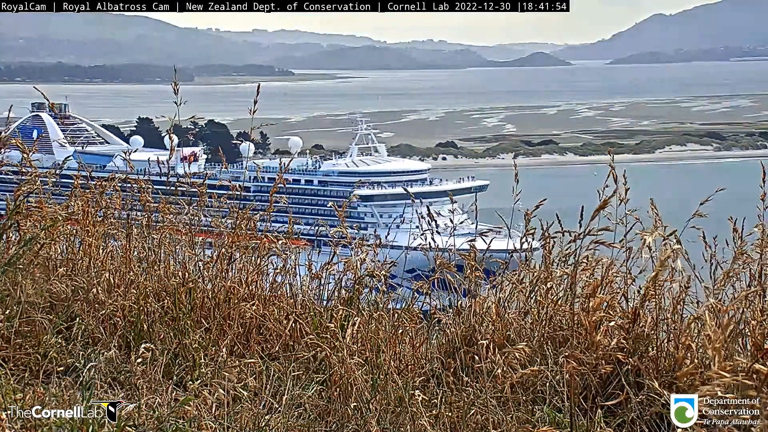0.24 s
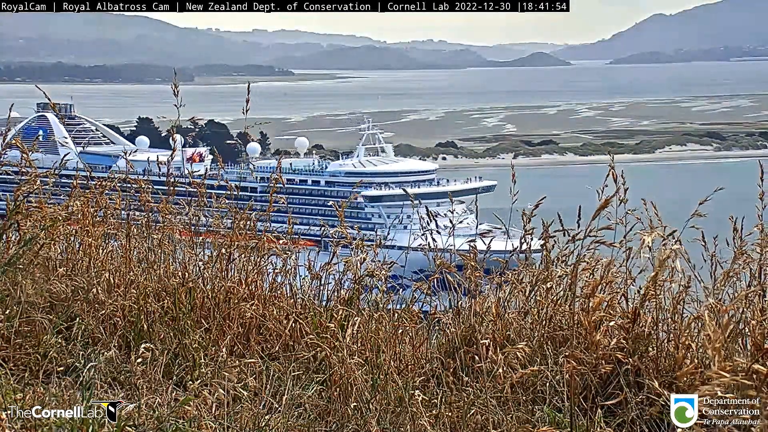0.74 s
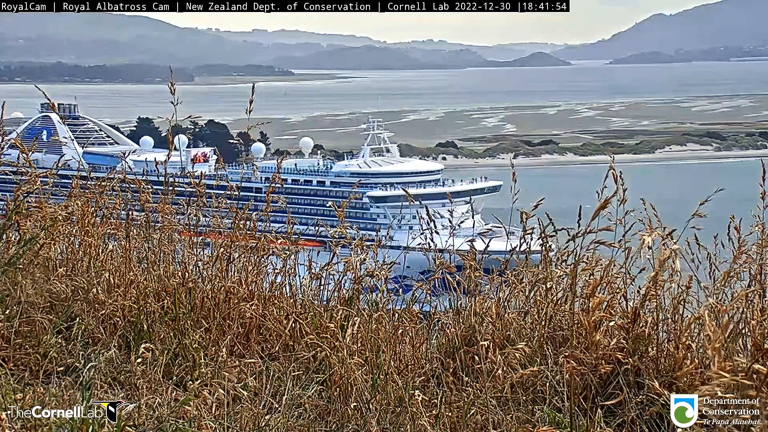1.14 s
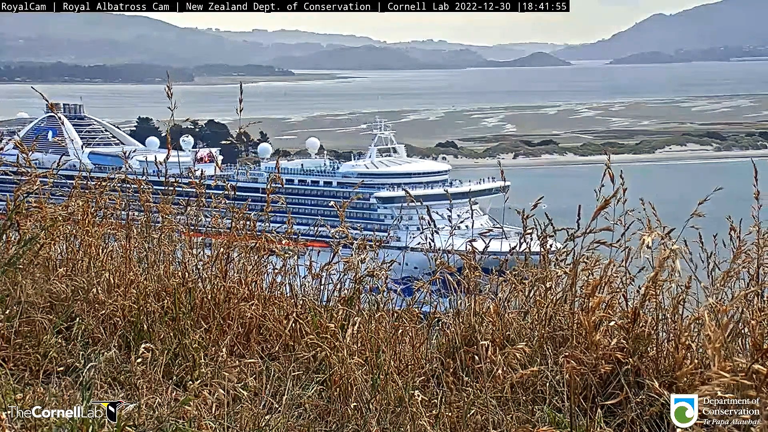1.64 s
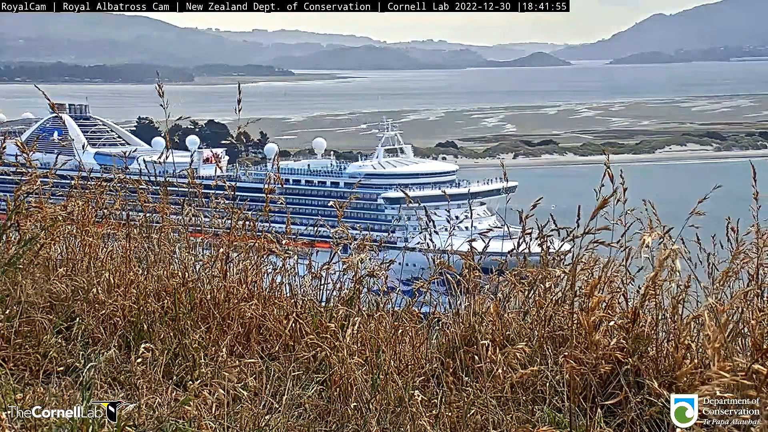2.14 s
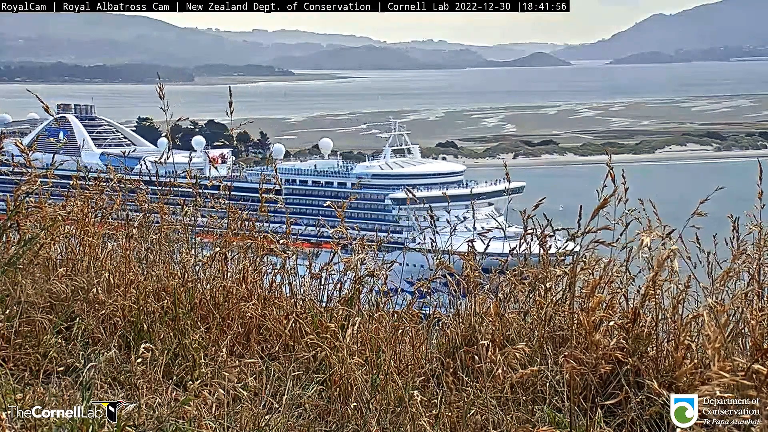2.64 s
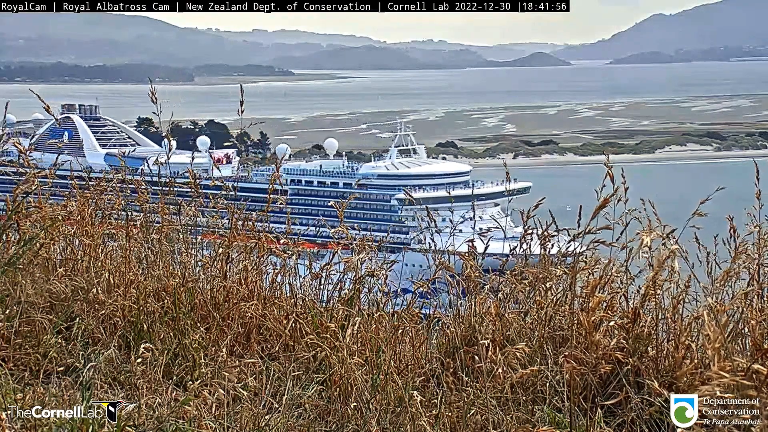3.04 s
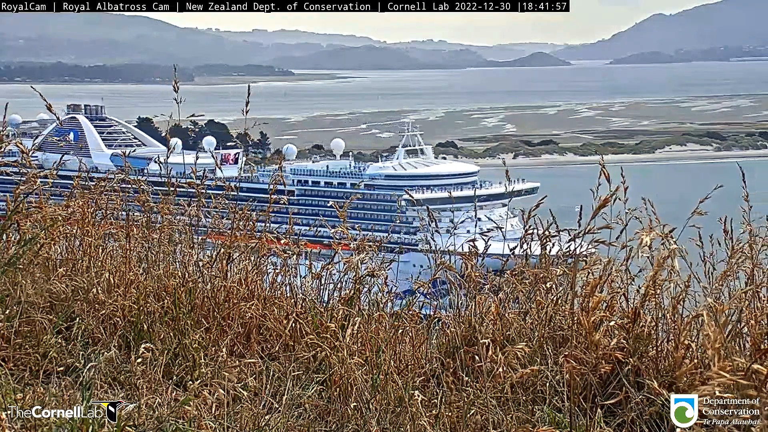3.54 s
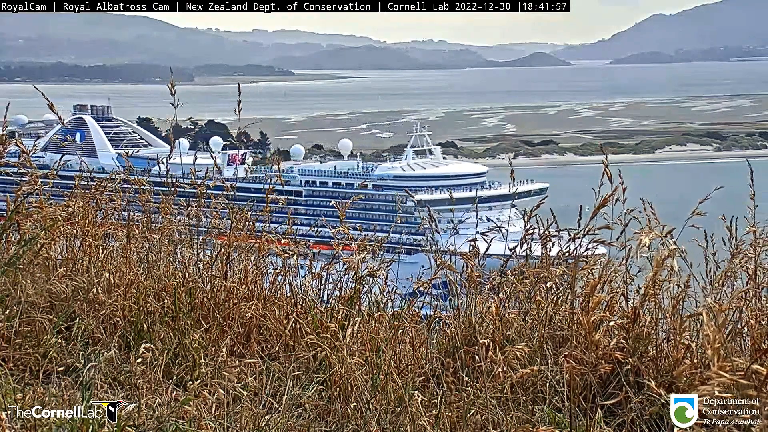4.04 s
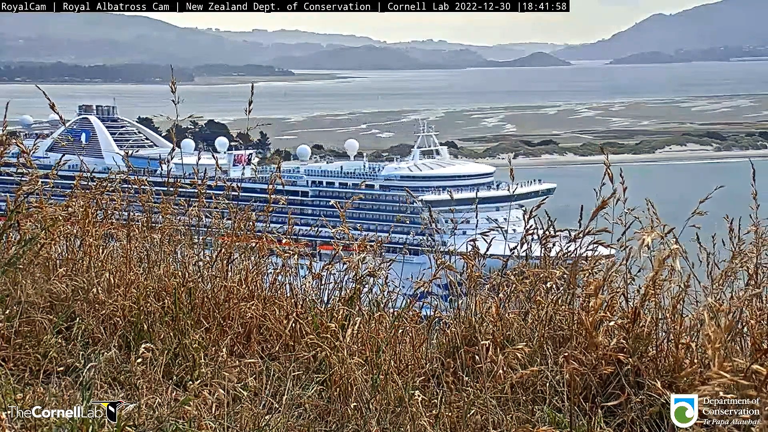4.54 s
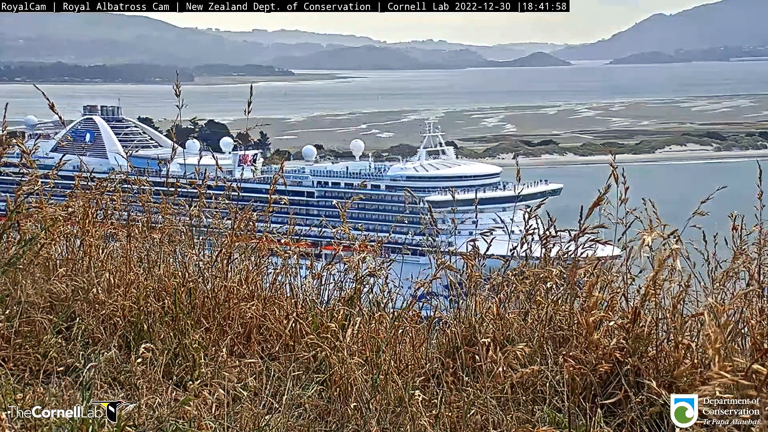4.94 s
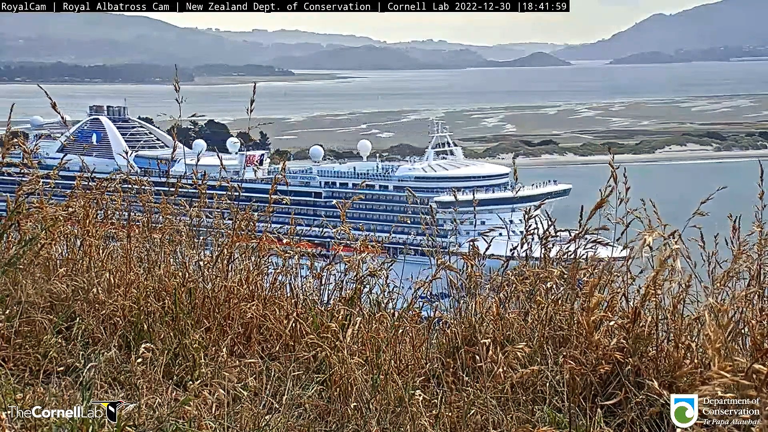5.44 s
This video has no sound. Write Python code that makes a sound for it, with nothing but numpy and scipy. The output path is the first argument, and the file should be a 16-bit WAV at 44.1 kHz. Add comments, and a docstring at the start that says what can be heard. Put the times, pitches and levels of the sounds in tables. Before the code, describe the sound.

Nearby gulls give short, hoarse, throbbing cries, overlapping at first and then coming in loose clusters with brief gaps. A few thin, faint chick whistles slip in between. Behind them a distant colony blurs into a chorus that swells toward the end, while a large ship hums steadily under a wash of sea noise. The small microphone on the coastal hillside dulls the treble slightly.

```python
"""Harsh, throbbing gull calls and thin chick whistles over a blurred far colony and a ship's hum.
Each gull's syrinx is cut off many times a second, its pitch rising in each throb, and the throat
colours the overtones. Near calls bounce off the ground; all calls scatter off the headland.
A large ship drones across the water in a wash of sea and colony noise.
A small camera microphone dulls the treble and adds one faint tick."""
import sys
import numpy as np
from scipy import signal
from scipy.io import wavfile
from scipy.ndimage import uniform_filter1d, map_coordinates

SR = 44100
rng = np.random.default_rng(int(sys.argv[2]) if len(sys.argv) > 2 else 0)


def wav_out(sig):
    """Save sig, one row per channel (or a flat mono array), as 16-bit PCM at SR to the path in sys.argv[1]."""
    wavfile.write(sys.argv[1], SR, np.round(np.clip(np.atleast_2d(sig).T, -1, 1) * 32767).astype(np.int16))


N = 250488

# gull throat resonances: f/Hz, relative level/dB
THROAT_RESPONSE = [(1050, -37.5), (1520, -13.5), (2000, -25.5), (2300, 6), (2800, 14.5), (3300, -3.5),
                   (3800, 3), (4050, -17), (4350, -15.5), (4750, -35.5), (5050, -46.5), (5650, -37),
                   (6050, -48), (7000, -53.5)]


def gain_of(db):
    return 10 ** (np.asarray(db) / 20)


def unit_rms(x):
    return x / np.sqrt(np.mean(x ** 2) + 1e-20)


def db_at(curve, hz):
    """Interpolate a level curve over log frequency."""
    f_hz, db = np.transpose(curve)
    return np.interp(np.log(hz + 1), np.log(f_hz + 1), db)


def add(mix, start_s, sound):
    """Mix in at start_s, cropped at both ends."""
    sound = sound[max(-round(start_s * SR), 0):]
    part = mix[max(round(start_s * SR), 0):][:len(sound)]
    part += sound[:len(part)]


def wander(count, rate_hz):
    """Smooth random drift, rms 1."""
    steps = np.arange(count) * rate_hz / SR
    return unit_rms(map_coordinates(rng.standard_normal(2000), [steps % 1990], order=3))


def strokes(rise_s, fall_s):
    """Ramps around a call's top: 1 to 0 before it, 0 to 1 after it."""
    t = np.arange(0, rise_s + fall_s, 1 / SR) - rise_s
    return np.maximum(-t / rise_s, 0), np.maximum(t / fall_s, 0)


def wash(level_db=-35.5):
    """Ship, sea and colony noise with drifting spectral patches."""
    # noise spectrum: f/Hz, relative density/dB
    spectrum = [(8.8, -56), (15, 2), (48, -4), (102, -4), (144, -8), (275, -19), (797, -19.5),
                (1030, -31.5), (1410, -20.5), (1930, -26.5), (2560, -4), (2840, -12), (7430, -59.5),
                (9660, -98.5), (16300, -120)]
    # lift around 1 kHz: t/s, level/dB
    mid_lift = [(0, 2), (1.8, 4), (2.2, 1), (3.199, 2), (3.801, 6), (5.0, 3.5), (5.68, 2.5)]
    frames, hz = N // 512 + 5, np.fft.rfftfreq(2048, 1 / SR)[:, None]
    frame_s = (np.arange(frames) - 2) * 512 / SR
    real, imag, patches = rng.standard_normal((frames, 1025, 3)).T
    patch_db = unit_rms(uniform_filter1d(uniform_filter1d(patches, 20, 0), 8, 1))
    mid_band = np.exp(-(np.log((hz + 1) / 1050) / 0.66) ** 2)
    mid_db = mid_band * np.interp(frame_s, *np.transpose(mid_lift))
    bins = (real + 1j * imag) * gain_of(db_at(spectrum, hz) + patch_db + mid_db)
    noise = signal.istft(bins, nperseg=2048, noverlap=1536)[1][:N]
    return gain_of(level_db) * unit_rms(noise)


def ship(whine_hz=465.8):
    """Wavering engine hum and a thin machinery whine of steady pitch."""
    # engine tones: f/Hz, level/dB, rms waver/Hz
    engine_tones = [(35.7, -40.5, 4.2), (59.9, -45, 3.8), (149.7, -47.5, 1.944)]
    # machinery whine: harmonic number, level/dB
    whine_partials = [(1, -63), (2, -68), (6, -48)]
    t = np.arange(N) / SR
    out = np.zeros(N)
    for hz, db, waver_hz in engine_tones:
        gain = gain_of(db + 1.5 * wander(N, 4.6))
        out += gain * np.sin(2 * np.pi * np.cumsum(hz + waver_hz * wander(N, 6)) / SR)
    for k, db in whine_partials:
        out += gain_of(db + wander(N, 5.3)) * np.sin(2 * np.pi * k * whine_hz * t)
    return np.sqrt(2) * out


def hillside(x, wet_db, t60_s):
    """Add echoes scattered off the slope: sparse decaying taps of random sign."""
    grid = np.arange(200, SR // 2, 20)
    delays = grid + rng.integers(0, 20, len(grid))
    taps = np.zeros(SR // 2 + 20)
    taps[delays] = rng.choice([-1., 1.], len(delays)) * gain_of(-60 * delays / SR / t60_s)
    return x + gain_of(wet_db) * signal.fftconvolve(x, taps / np.linalg.norm(taps))[:N]


def syrinx(hz, throb_hz, swing, duty=.78, leak=.12, jitter=.12, rasp=.23):
    """Pitch, phase and gate of a chopped voice; pitch rises about 3 * swing * hz in each throb."""
    n = len(hz)
    throb_phase = (np.cumsum(throb_hz * (1 + .012 * wander(n, 30))) / SR) % 1 / duty
    skew = .65 - 1.576 * swing  # opens faster than it shuts, more so in harsh cries
    gate = leak + np.sin(np.pi * np.minimum(throb_phase, 1) ** skew) ** 1.116
    gate = uniform_filter1d(gate, size=50)
    slide = uniform_filter1d(-3 * np.exp(-5.5 * throb_phase), size=80)
    slide -= np.average(slide, weights=gate ** 2)
    sung_hz = hz * (1 + swing * (slide + jitter * wander(n, 400)) + .0049 * wander(n, 149.3))
    gate *= 1 + rasp * (1 + 3 * swing) * wander(n, 500)  # uneven membranes roughen each throb
    cycles = rng.random() + np.cumsum(sung_hz) / SR
    return sung_hz, cycles, unit_rms(gate) * gain_of(.29 * wander(n, 80))


def far_colony(calls=150):
    """Overlapping calls of random pitch, length and distance blur into a chorus."""
    # chorus loudness: t/s, rms level/dB
    chorus_level = [(0, -41.5), (1.051, -48), (1.9, -39), (2.351, -47.5), (3.0, -47.5), (3.646, -39.5),
                    (4.3, -36.5), (5.68, -38)]
    out = np.zeros(N)
    for i, (offset, length, pitch, nearness, throb) in enumerate(rng.random((calls, 5))):
        arch = np.sin(np.linspace(.3, 2.6, round((.15 + .25 * length) * SR)))
        hz = (900 + 600 * pitch) * (1 + .15 * arch)
        sung_hz, cycles, gate = syrinx(hz, throb_hz=68 + 16 * throb, swing=.07)
        tone = sum(gain_of(.71 * db_at(THROAT_RESPONSE, k * sung_hz)) * np.sin(2 * np.pi * k * cycles)
                   for k in range(1, 6))
        start_s = (i + offset) * N / SR / calls - .15
        add(out, start_s, gain_of(10 * nearness) * tone * gate * signal.windows.tukey(len(hz), .3))
    out = hillside(out, wet_db=-6.5, t60_s=.18)
    out /= np.sqrt(uniform_filter1d(out ** 2, SR // 3) + 1e-12)
    return out * gain_of(np.interp(np.arange(N) / SR, *np.transpose(chorus_level)))


def chicks(tilt_db_per_khz=-11, fade_db=-4):
    """Thin, unsteady gliding whistles, fainter as they climb and as they end."""
    # whistles: start/s, rise/s, fall/s, opening f/Hz, top f/Hz, closing f/Hz, level at 4 kHz/dB
    whistles = [ (1.518, .07, .05, 3500, 4200, 4400, -39), (1.63, .04, .08, 4400, 4600, 4380, -47),
                (1.755, .005, .085, 4000, 4000, 3600, -49), (3.81, .06, .09, 3450, 4060, 4020, -50),
                (3.85, .11, .02, 4350, 4710, 4690, -47.5), (3.978, .005, .045, 4400, 4400, 3880, -48),
                (4.72, .11, .01, 3900, 4630, 4630, -50), (4.745, .05, .01, 3400, 3850, 3850, -47),
                (5.42, .03, .04, 4200, 4700, 4300, -52), (5.57, .09, .03, 3750, 4230, 4230, -55), ]
    out = np.zeros(N)
    for start_s, rise_s, fall_s, open_hz, top_hz, close_hz, level_db in whistles:
        before, after = strokes(rise_s, fall_s)
        hz = top_hz + (open_hz - top_hz) * before ** 1.8 + (close_hz - top_hz) * after ** 1.2
        n = len(hz)
        cycles = np.cumsum(hz * (1 + .007 * wander(n, 200) + .004 * wander(n, 25))) / SR
        db = level_db + tilt_db_per_khz * (hz / 1000 - 4) + fade_db * after + 2.2 * wander(n, 30)
        envelope = gain_of(db) * signal.windows.tukey(n, .15)
        add(out, start_s, np.sqrt(2) * envelope * np.sin(2 * np.pi * cycles))
    return out


def near_gulls(throat_follow=.53, brighten=.032):
    """Hoarse cries: six syrinx harmonics slide through throat resonances that partly follow the glide."""
    # cries: start/s, rise/s, fall/s, opening f/Hz, top f/Hz, closing f/Hz,
    # levels of harmonics 2-5/dB, closing effort (about 2 dB a unit), throb rate/Hz, swing
    cries = [ (-0.06, 0.17, 0.2, 1090, 1137, 1110, -50, -35.5, -49, -63, -7, 65, 0.064),
             (0.238, 0.081, 0.26, 1272, 1308, 1294, -39.5, -42.5, -70.5, -86, -4.5, 80, 0.07),
             (0.344, 0.02, 0.059, 1160, 1184, 1223, -30, -42, -58, -66.5, -1.5, 76, 0.016),
             (0.533, 0.095, 0.22, 1140, 1188, 1201, -31, -39.5, -55.5, -68, -8, 76, 0.04),
             (0.679, 0.13, 0.021, 1150, 1172, 1180, -32.5, -29, -50, -58.5, 2, 76, 0.05),
             (0.823, 0.042, 0.12, 1133, 1098, 1085, -42, -36, -43.5, -60, -3, 72, 0.065),
             (1.137, 0.047, 0.21, 1200, 1455, 1428, -25, -37.5, -79, -96, -1, 84.5, 0.12),
             (1.164, 0.032, 0.14, 1020, 1070, 1033, -41.5, -35, -52, -62.5, -1.5, 80, 0.036),
             (1.351, 0.048, 0.2, 1417, 1401, 1315, -19, -38, -50, -87, -10, 82, 0.12),
             (1.376, 0.078, 0.17, 1090, 1175, 1128, -31, -33.5, -49, -62.5, -3, 80, 0.036),
             (1.612, 0.052, 0.082, 1140, 1183, 1087, -56, -41, -61, -69, -3.5, 74, 0.017),
             (1.789, 0.09, 0.1, 1060, 1075, 1010, -58, -45, -48, -59, -3, 90, 0.049),
             (1.948, 0.073, 0.18, 1080, 1111, 1078, -47, -43, -51, -63.5, -1.5, 64, 0.0502),
             (2.442, 0.12, 0.38, 1027, 1181, 1093, -32, -36, -53.5, -65.5, -11, 78, .022),
             (2.502, 0.11, 0.14, 1170, 1258, 1188, -28, -39.5, -74.5, -85, -1.5, 78, .04),
             (2.435, 0.0045, 0.14, 1400, 1485, 1412, -34, -61, -69, -90.5, -8.5, 82, 0.053),
             (3.101, 0.076, 0.18, 1385, 1446, 1400, -36, -52, -51.5, -86, -6, 81.6, .05),
             (3.295, 0.034, 0.1, 1100, 1112, 1068, -40, -54, -52, -55, -2, 80, 0.066),
             (3.334, 0.15, 0.12, 1115, 1209, 1079, -24.5, -48.5, -56, -63, -6.5, 78.6, 0.026),
             (3.56, 0.0095, 0.12, 1080, 1100, 1043, -42, -60, -58.5, -60, -0.5, 75, 0.017),
             (3.552, 0.086, 0.083, 1392, 1474, 1394, -34, -59, -67, -84, -1.5, 71, 0.13),
             (3.97, 0.072, 0.06, 1170, 1173, 1210, -56.5, -49, -65.5, -80, -6, 53, 0.021),
             (4.812, 0.066, 0.23, 1135, 1244, 1175, -28.5, -25, -60, -65.5, -6.5, 76, 0.03),
             (5.05, 0.036, 0.18, 1140, 1140, 1080, -36, -56, -61, -59, -7, 74, 0.04),
             (5.36, 0.083, 0.25, 1120, 1102, 1110, -48.5, -48, -71, -68, -6, 64, 0.018), ]
    out = np.zeros(N)
    for start_s, rise_s, fall_s, open_hz, top_hz, close_hz, *mid_db, end_effort, throb_hz, swing in cries:
        before, after = strokes(rise_s, fall_s)
        opening, closing = before ** 2.2, after ** 1.4
        hz = top_hz + (open_hz - top_hz) * opening + (close_hz - top_hz) * closing
        effort = -3 * opening + end_effort * closing
        sung_hz, cycles, gate = syrinx(hz, throb_hz, swing)
        throat_hz = sung_hz * (top_hz / hz) ** throat_follow
        flatness = np.minimum(sung_hz / hz - 1, 0) ** 2
        first_db = mid_db[0] + 6.5 + db_at(THROAT_RESPONSE, top_hz) - db_at(THROAT_RESPONSE, 2 * top_hz)
        tone = 0
        for k, level_db in enumerate([first_db, *mid_db, mid_db[-1] - 15], 1):
            upper = max(k - 2, 0)
            throat_db = db_at(THROAT_RESPONSE, k * throat_hz) - db_at(THROAT_RESPONSE, k * top_hz)
            flat_db = -600 * upper * flatness  # upper harmonics are weak while a throb is still flat
            colour_db = uniform_filter1d(.99 * throat_db + flat_db, size=70)
            swell_db = effort * (2 + brighten * upper)
            flutter_db = 1.2 * wander(len(hz), 299.9)  # independent per harmonic: hoarseness
            gain = gain_of(level_db + colour_db + swell_db + flutter_db)
            tone += gain * np.sin(2 * np.pi * k * cycles)
        add(out, start_s, np.sqrt(2) * tone * gate * signal.windows.tukey(len(hz), .07))
    return out


def scene():
    """Near birds and their echoes over the background, mono."""
    near = near_gulls() + chicks()
    near[180:] += gain_of(-18.5) * near[:-180]  # ground bounce, 4 ms
    return (hillside(near, wet_db=-11.5, t60_s=.099) + far_colony() + wash() + ship())[None]


def record(dry, band_hz=7585, top_hz=16000, tick_s=.4225, tick_decay_s=.0004):
    """Camera microphone: band limit, one faint tick on the line, final low-pass."""
    out = signal.oaconvolve(dry, signal.firwin(511, band_hz, window=("kaiser", 9), fs=SR)[None], "same")
    add(out[0], tick_s, gain_of(-35) * np.exp(-np.arange(200) / SR / tick_decay_s))
    return signal.oaconvolve(out, signal.firwin(255, top_hz, window=("kaiser", 9), fs=SR)[None], "same")


dry = scene()
out = record(dry)
wav_out(out)
```